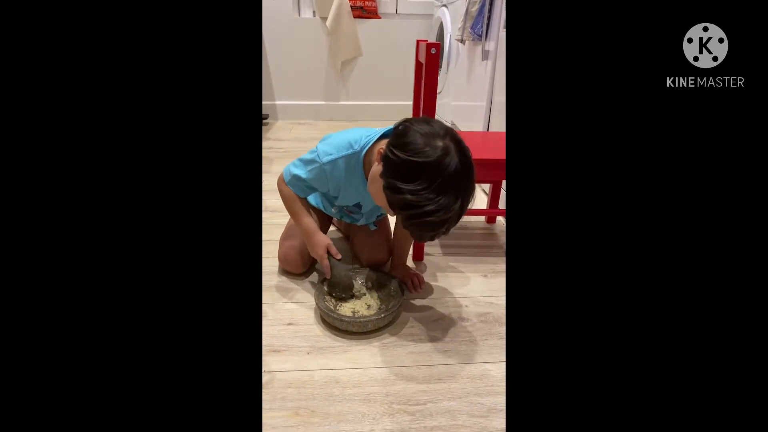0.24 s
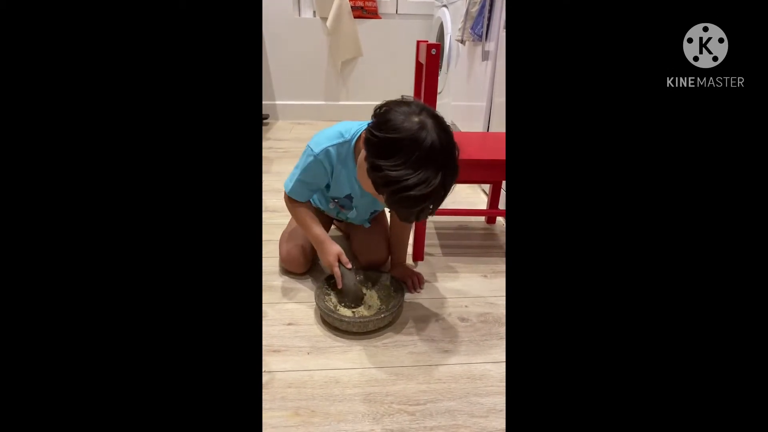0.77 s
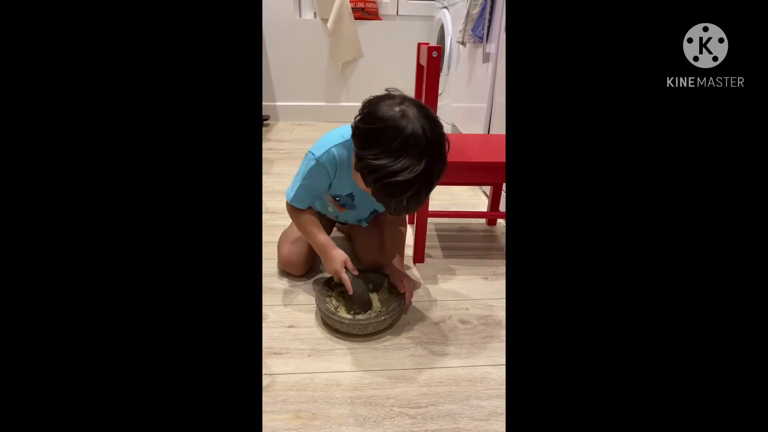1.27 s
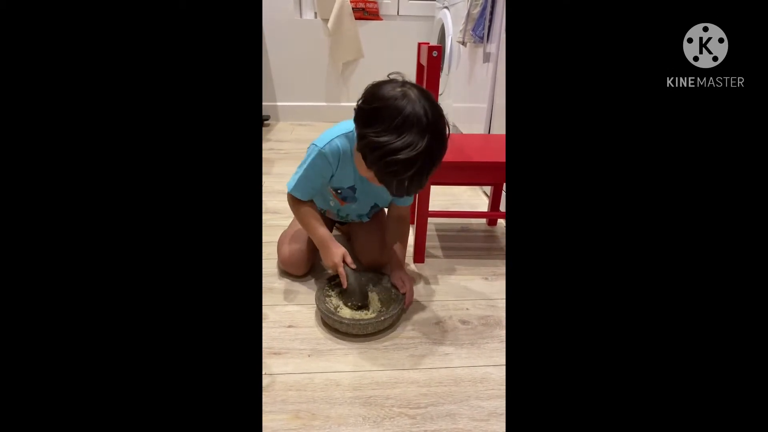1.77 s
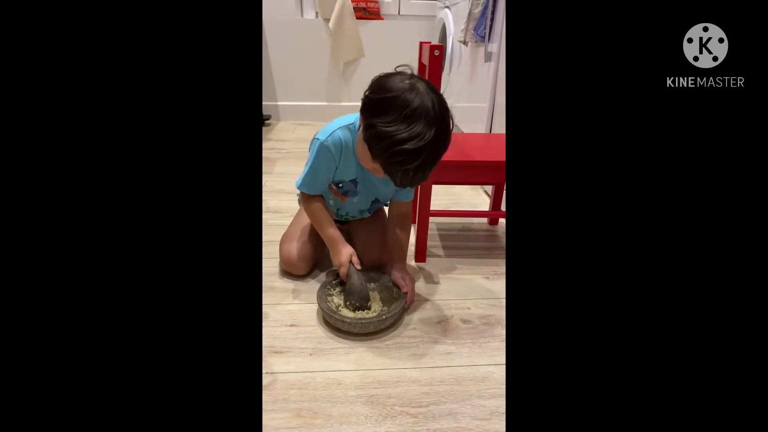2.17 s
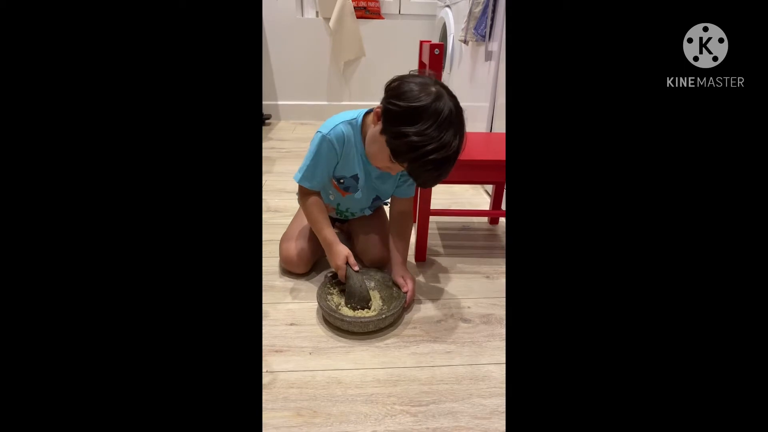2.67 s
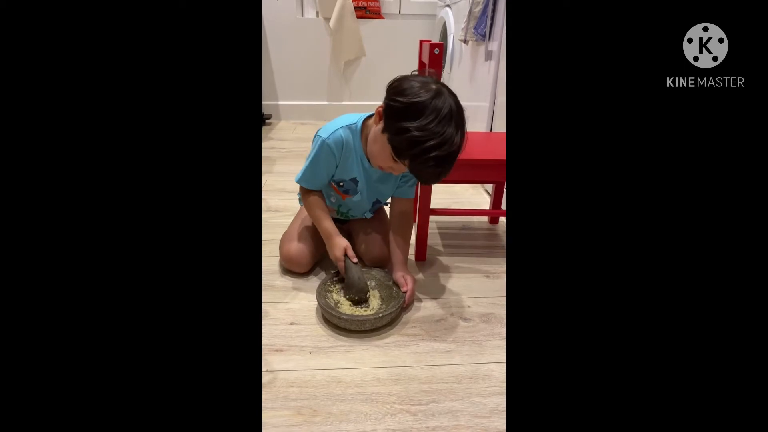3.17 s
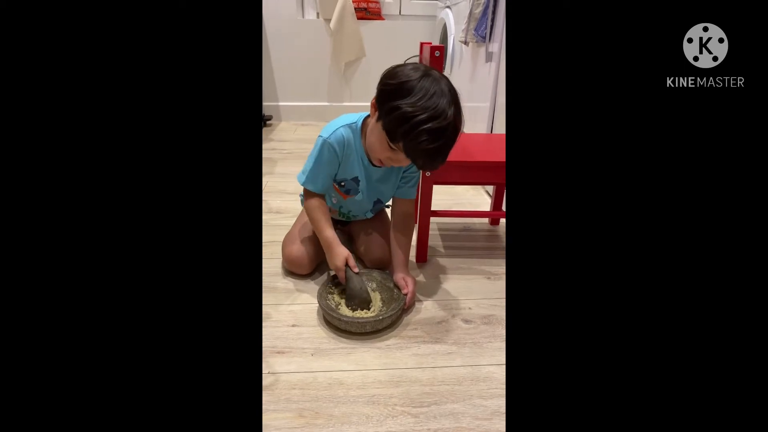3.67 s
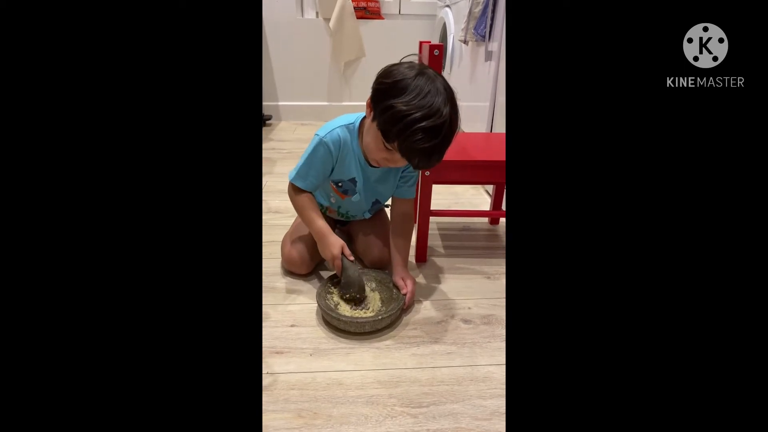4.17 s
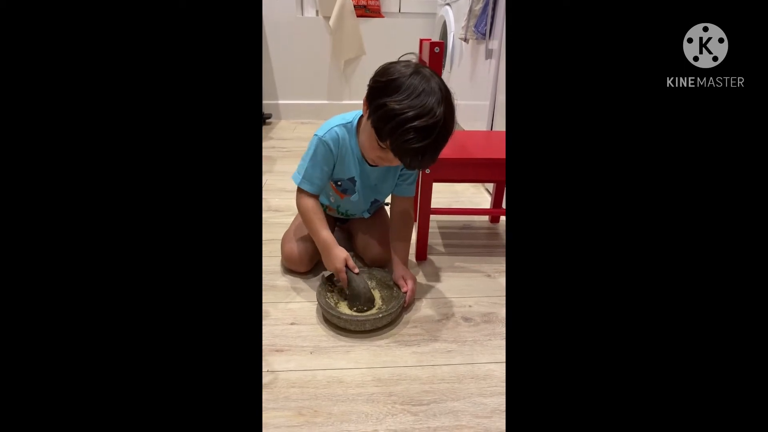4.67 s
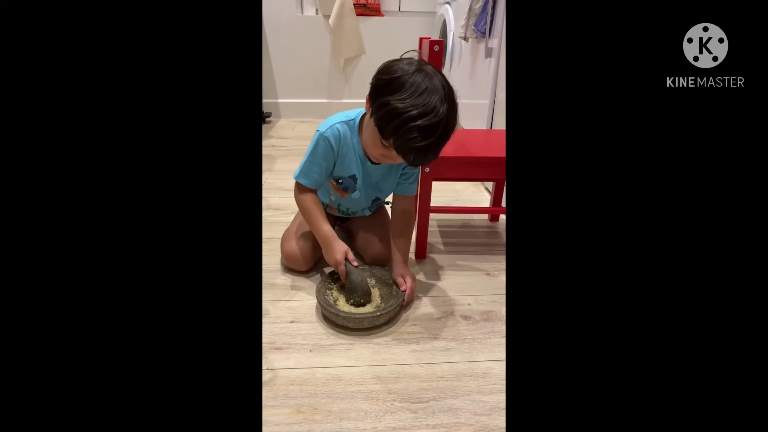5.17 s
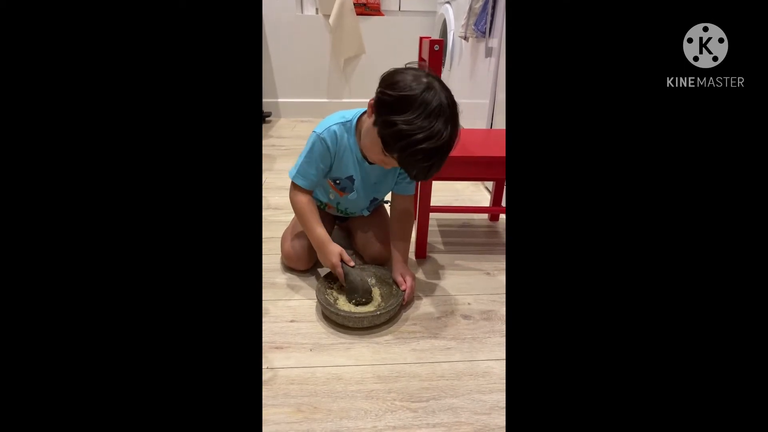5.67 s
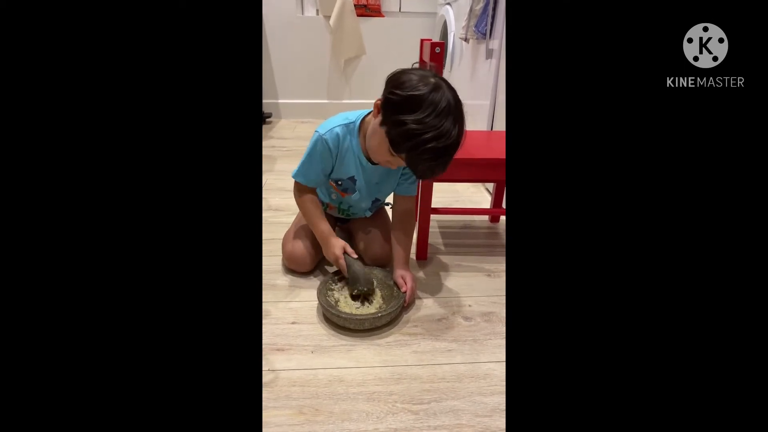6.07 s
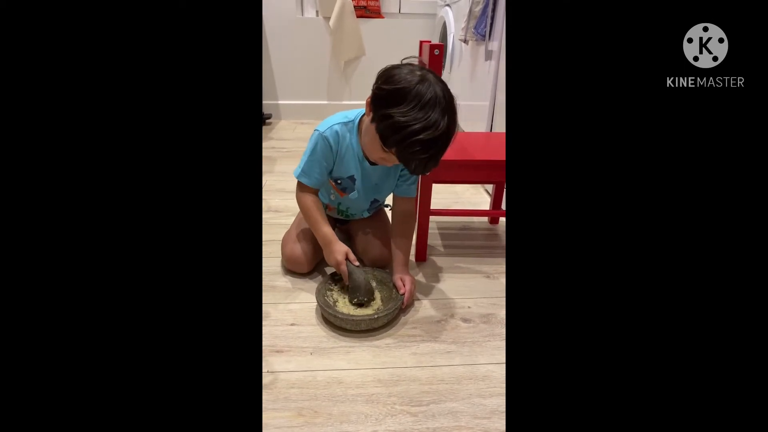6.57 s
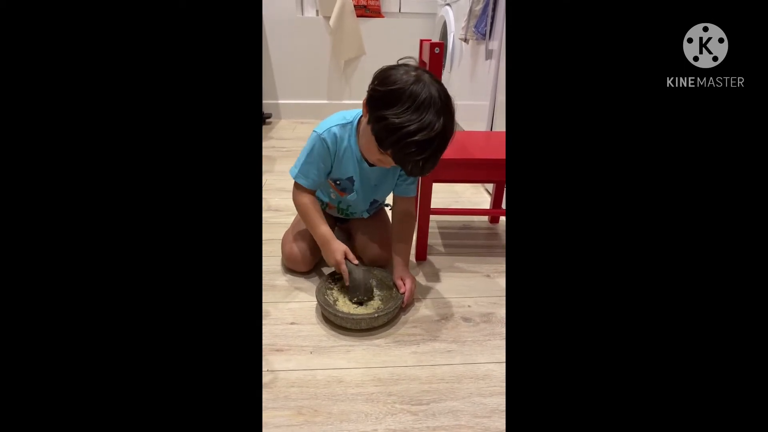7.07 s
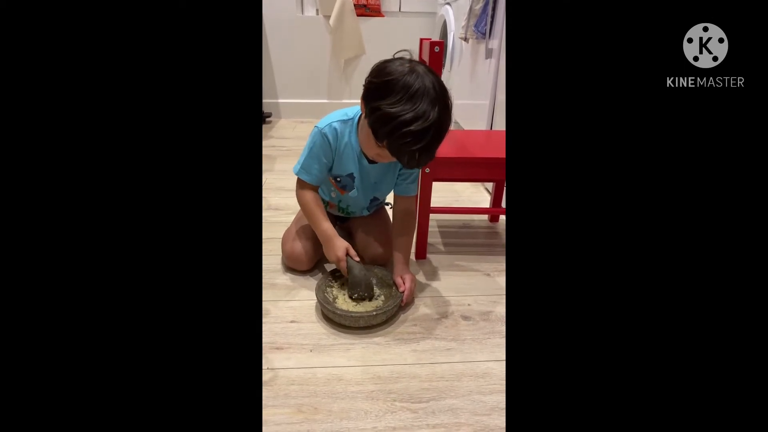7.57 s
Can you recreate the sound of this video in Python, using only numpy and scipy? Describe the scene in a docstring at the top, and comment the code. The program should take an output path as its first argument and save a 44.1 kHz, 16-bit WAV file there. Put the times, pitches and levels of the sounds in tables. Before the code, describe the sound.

Indoors in a small room with about a second of reverberation, heard close in stereo. At 0 s the tail of an earlier knock and its floor shudder dies away into quiet air. At 0.6 s a heavy low thump with a grain crunch. From 0.9 to 2.4 s quick grinding strokes, seven or eight a second, gritty and scraping, loudest around 1.6 to 2.1 s, with bright stony chinks and low lurches of the boards. After a pause, a loud hard clack rings at 2.85 s. From 3.05 to 5.3 s softer, duller strokes roll on, with muffled bumps near 3.6, 4.1 and 4.4 s and scattered grain snaps. Around 5.7 s a very faint woody creak ticks. Scraping returns at 5.9 to 6.6 s, harshest at 6.0 and 6.3. A second loud clack hits at 6.85 s, a lesser thud at 7.16 s, then soft strokes to about 7.7 s.

```python
"""A stone pestle grinds dry grains in a stone mortar on a wooden floor in a small room.
Strokes are random fracture clicks heard through bowl and pestle; rolling stone rumbles the floor and each
stroke lurches it. Knocks and chinks are damped modes, grain snaps are noise bursts, a creak is soft ticks.
An earlier knock, as fading noise, is still dying away at the start over still room air."""
import sys
import numpy as np
from scipy import signal
from scipy.fft import rfft, irfft, next_fast_len
from scipy.io import wavfile

SR = 44100
rng = np.random.default_rng(int(sys.argv[2]) if len(sys.argv) > 2 else 0)


def generate_wav(signal):
    """Clip the signal to [-1, 1] and save it as 16-bit WAV at the path in sys.argv[1]."""
    frames = np.transpose(np.atleast_2d(signal))
    scaled = np.clip(frames, -1, 1) * 32767
    pcm = np.round(scaled).astype(np.int16)
    wavfile.write(sys.argv[1], SR, pcm)


N = 345296


def amp(db):
    """Decibels to gain."""
    return 10 ** (np.asarray(db) / 20)


def unit_rms(x):
    """Scales to an rms of 1."""
    return x / np.sqrt(np.mean(x ** 2) + 1e-20)


def read(points, hz):
    """Interpolates a table along a log-frequency axis."""
    point_hz, value = np.transpose(points)
    return np.interp(np.log(hz + 1), np.log(point_hz + 1), value)


def add(mix, start_s, sound):
    """Mixes a sound in at start_s."""
    part = mix[max(round(start_s * SR), 0):][:len(sound)]
    part += sound[:len(part)]


def bins_hz(size):
    """Frequencies of a spectrum of size samples."""
    return np.fft.rfftfreq(size, 1 / SR)


def coloured(x, points):
    """Shapes x by a smooth gain curve, at an rms of 1."""
    size = next_fast_len(x.shape[-1] + SR // 20)
    gain = amp(read(points, bins_hz(size)))
    return unit_rms(irfft(rfft(x, size) * gain, size)[..., :x.shape[-1]])


def cut(x, hz, kind, order):
    """Butterworth low-pass or high-pass."""
    sos = signal.butter(order, min(hz, SR / 2 - 1), kind, fs=SR, output="sos")
    return signal.sosfilt(sos, x)


def ringing(modes, size=30000):
    """Click response of a body: a sum of exponentially decaying modes."""
    t = np.arange(size) / SR
    return sum(amp(level_db) * np.exp(-np.log(1000) * t / t60_s) * np.cos(2 * np.pi * pitch_hz * t)
               for pitch_hz, level_db, t60_s in modes)


# left-right likeness of room sound at two close ports: [freq_hz, likeness_0_to_1]
PORT_LIKENESS = [(200, .99), (500, .88), (1200, .75), (2300, .2), (3300, .3), (4800, .65), (8000, .98),
                 (11000, .98), (15000, .7)]


def diffuse(pair):
    """Makes two unrelated signals as alike as room sound is at two close ports."""
    size = next_fast_len(pair.shape[-1])
    a, b = rfft(pair, size)
    same = np.clip(read(PORT_LIKENESS, bins_hz(size)), 0, 1)
    return irfft(np.array([a, same * a + np.sqrt(1 - same ** 2) * b]), size)[:, :pair.shape[-1]]


# room decay: [freq_hz, t60_s]
ROOM_DECAY = [(80, 0.79), (250, 0.74), (800, 0.9), (1600, 1), (3200, 0.9), (7000, 0.77), (15000, 1)]


def dying(pair, stretch=1):
    """Lets every band fade at the pace of the room, times stretch."""
    hz, t, z = signal.stft(pair, SR, nperseg=256)
    t60_s = stretch * read(ROOM_DECAY, hz)[:, None]
    fade = np.exp(-np.log(1000) * t / t60_s)
    return signal.istft(z * fade, SR, nperseg=256)[1][:, :pair.shape[-1]]


# spectra of still air, earlier knock's echo, floor shudder: [freq_hz, gain_db]
AIR_COLOUR = [(20, -52), (35, -36.5), (50, 9), (75, -6), (130, -11), (220, -21), (400, -22.5), (800, -22),
              (1600, -30), (3200, -27), (7000, -34), (15000, -40.5)]
ECHO_COLOUR = [(25, -2.5), (80, -1), (300, -12), (600, -16.5), (1200, -22.5), (2500, -24.5), (5000, -27.5),
               (9000, -32), (14000, -56), (16000, -39)]
SHUDDER_COLOUR = [(25, -14), (48, -1), (85, 9), (110, -5.5), (140, 7), (230, 2), (320, 0.5), (450, -7.5),
                  (800, -56.5)]


def background():
    """Still room air, and the fading echo and floor shudder of the knock just before, all shaped noise."""
    t = np.arange(N) / SR
    air = amp(-55.5) * coloured(diffuse(rng.standard_normal((2, N))), AIR_COLOUR)
    echo = coloured(diffuse(rng.standard_normal((2, N))), ECHO_COLOUR)
    echo = amp(-27) * dying(echo, stretch=.93)
    shudder = amp(-18.5) * coloured(rng.standard_normal(N), SHUDDER_COLOUR) * np.exp(-t / .023)
    return air + echo + shudder


# stone on stone; levels relative within each column:
# [start_s, blow_db, contact_cutoff_hz, crunch_db, thump_db, thump_hz, thump_decay_s]
KNOCKS = [(.621, -25, 1240, -26.5, -17.5, 86.8, .032), (1.091, -30, 1940, -36.5, -45, 160, .008),
          (2.847, -2, 3900, -11.5, -1.5, 159.6, .0038), (3.575, -48, 1200, -42, -28, 88, .018),
          (4.089, -52, 1970, -37, -27, 131, .0047), (4.3787, -46, 1093, -26.5, -23.5, 148, .0067),
          (6.8534, -4.3, 2150, -16, -7, 186, .0052), (7.158, -28, 1196, -28, -22.5, 159.8, .019)]
# bowl modes before damping, quick clack then lasting ring: [pitch_hz, level_db, t60_s]
BOWL_MODES = [(487, -19.5, 0.12), (820, -17, 0.051), (1302, -8, 0.024), (1563, 5.5, 0.032),
              (2010, -4, .025), (2325, -9, 0.012), (2885, -7.5, 0.027), (3663, -6, 0.053), (814, -37.5, .3),
              (1470, -30, .42), (1571, -22, .6), (1602, -29, 1), (1659, -27, .35), (3890, -30, 0.62)]
# spectrum of crushed grain: [freq_hz, gain_db]
CRUNCH_COLOUR = [(200, -12), (500, -1), (850, 5.5), (1500, -5.5), (2300, -9), (3800, -15), (5000, -15),
                 (8000, -26.5), (16000, -37)]
SETTLE_DB, SETTLE_S = -4.5, .024  # the pestle comes to rest on the ringing stone and damps it
GRAZE_LEAD_S, GRAZE_DB = .009, -25  # the pestle grazes the bowl just before it lands


def knocks():
    """A short contact rings the bowl and crushes what lies under it; then the floor gives and shudders."""
    out, bowl = np.zeros(N), ringing(BOWL_MODES)
    t = np.arange(len(bowl)) / SR
    settle = amp(SETTLE_DB * (1 - np.exp(-(t / SETTLE_S) ** 2)))
    for start_s, blow_db, cutoff_hz, crunch_db, thump_db, thump_hz, thump_decay_s in KNOCKS:
        clack = cut(bowl, cutoff_hz, "low", order=3)
        clack = cut(clack, 4300, "low", order=6)  # no contact is short enough to ring the top
        clack = amp(blow_db - 7) * settle * cut(clack, 350, "high", order=2)
        add(out, start_s - GRAZE_LEAD_S, amp(GRAZE_DB) * clack)
        add(out, start_s, clack)

        crunch = coloured(rng.standard_normal(len(t)), CRUNCH_COLOUR) * np.exp(-t / .005)
        add(out, start_s, amp(crunch_db - 4) * cut(crunch, 5000, "low", order=2))

        bounce = -np.sin(2 * np.pi * thump_hz * t) * np.exp(-t / thump_decay_s)
        bounce *= 1 - np.exp(-t / .0005)
        shudder = coloured(rng.standard_normal(len(t)), SHUDDER_COLOUR)
        shudder *= np.exp(-t / .044) * (1 - np.exp(-t / .0041))
        thump = cut(bounce + amp(-16.5) * shudder, 38, "high", order=2)
        add(out, start_s + .003, amp(thump_db) * thump)
    return out


# large grains crack; levels relative: [start_s, treble_db, body_re_treble_db]
SNAPS = [(.617, -18.5, -2.5), (.6207, -22, -17), (.8062, -30.5, -1.5), (.8756, -32, -2.5),
         (1.1638, -42.5, 9.5), (2.9422, -34, 8), (3.0772, -40.5, 9), (3.549, -39, -1.5), (4.936, -40, -2),
         (4.9914, -46, 20), (5.131, -43, 4), (5.2609, -36, 2), (5.441, -43.5, -6), (5.573, -40, -7),
         (6.0203, -35.5, 13.5), (6.2909, -45, 22), (6.5063, -43, -4.5), (7.0504, -44, -.5),
         (7.426, -35, -16), (7.6344, -41, 4)]
# spectrum of a bursting grain: [freq_hz, gain_db]
CRACK_COLOUR = [(300, -27), (900, -2.5), (4000, 8.5), (7000, 11), (13000, 2), (16000, 10.5)]


def snaps():
    """A grain bursts in a few milliseconds of bright crackle."""
    out, t = np.zeros(N), np.arange(2048) / SR
    for start_s, treble_db, body_db in list(SNAPS) + small_snaps():
        burst = coloured(rng.standard_normal(len(t)), CRACK_COLOUR)
        treble = cut(burst, 3500, "high", order=3)
        body = cut(burst, 3700, "low", order=3)
        crackle = treble + amp(body_db + 4.5) * body
        add(out, start_s, amp(treble_db + 1) * crackle * np.exp(-t / .0024))
    return out


# strokes: [start_s, length_s, floor_weight_db, grit_bite_db, board_pitch_hz]
STROKES = [(.867, .16, -7, -17, 140), (1.045, .077, -7, -16, 190), (1.181, .1, -2, -9, 175),
           (1.3, .12, -6, -13, 170), (1.44, .1, 1, -3, 190), (1.553, .067, -7, -13, 165),
           (1.624, .047, -3, 1, 190), (1.741, .105, -4, -1, 205), (1.887, .09, -6, -2.5, 215),
           (2.025, .099, -3, -2.5, 170), (2.147, .088, -11, -13, 155), (2.281, .077, -13, -8, 185),
           (3.052, .12, -6, -18, 168), (3.227, .12, -9, -16, 160), (3.406, .094, -4, -18, 160),
           (3.538, .12, -11, -16, 160), (3.703, .1, -2, -14, 172), (3.824, .13, -4, -14, 200),
           (3.981, .11, -10, -11, 160), (4.457, .092, -11, -18, 165), (4.595, .086, -7, -16.5, 170),
           (4.737, .14, -11, -15, 200), (4.941, .13, -1, -8, 185), (5.096, .11, -7, -10, 175),
           (5.215, .097, -28, -22, 150), (5.54, .093, -11, -26, 148), (5.876, .1, -9, -23, 175),
           (6.009, .087, -3, -1, 195), (6.147, .085, -4, -17, 180), (6.278, .096, -4, -5.5, 160),
           (6.401, .084, -6, -20, 160), (6.522, .098, -7, -19, 210), (6.937, .066, -3, -14, 145),
           (7.047, .11, -4, -17, 155), (7.215, .062, -3, -22, 185), (7.374, .11, -16, -30, 145),
           (7.506, .079, -8, -17.5, 155), (7.612, .094, -2, -20, 140)]
SMALL_SNAP_CHANCE = .5  # per stroke
SMALL_SNAP_DB, SMALL_SNAP_SPREAD_DB, SMALL_SNAP_BODY_DB = -50, 3, 15
SMALL_SNAP_DB_PER_BITE_DB = .5  # a harder bite cracks larger grains


def small_snaps():
    """Lesser grains give way at chance moments as a stroke presses down: rows like those of SNAPS."""
    rows = []
    for start_s, length_s, _, bite_db, _ in STROKES:
        luck, place, size = rng.random(3)
        if luck < SMALL_SNAP_CHANCE:
            snap_s = start_s + length_s * (.25 + place / 2)
            treble_db = SMALL_SNAP_DB + SMALL_SNAP_DB_PER_BITE_DB * bite_db
            treble_db += SMALL_SNAP_SPREAD_DB * (2 * size - 1)
            rows.append((snap_s, treble_db, SMALL_SNAP_BODY_DB))
    return rows


def grit(per_s, spread_db):
    """Tiny fractures under the pestle: random clicks, a few much larger than the rest."""
    size = amp(spread_db * np.minimum(rng.exponential(1, N), 4))
    happens = rng.random(N) < per_s / SR
    return unit_rms(size * rng.choice([-1., 1.], N) * happens)


def pressure(layer, efforts_db):
    """Each stroke swells, holds and eases off; a layer grows with the effort by its own law."""
    full_db, growth, lag_s, length_share, steepness = layer
    t, power = np.arange(0, N, 64) / SR, 0
    for (start_s, length_s, *_), effort_db in zip(STROKES, efforts_db):
        u = (t - start_s - length_s / 2 - lag_s) / (length_s * length_share / 2)
        power = power + amp(full_db + growth * effort_db) ** 2 * np.exp(-abs(u) ** steepness)
    return np.interp(np.arange(N) / SR, t, np.sqrt(power))


# nominal pestle modes: [pitch_hz, level_db, t60_s]
PESTLE_MODES = [(3070, -24.5, 0.044), (3240, -31, .04), (3133, 3, 0.056), (3263, -6, .025),
                (3520, -14.5, 0.033), (3850, -10.5, .03), (4860, 0, 0.047), (5497, -8.5, .01),
                (7033, -13, .022), (8450, -49, 0.051), (11000, -22, 0.006), (13400, -15, .02)]


def pestle(fractures, detune=.011, vary_db=9.5, count=24, size=1400):
    """The contact point rolls on; each spot favours and bends the modes in its own way."""
    spots = []
    for draw in rng.standard_normal((count, len(PESTLE_MODES), 2)):
        modes = [(pitch_hz * (1 + detune * bend), level_db + vary_db * favour, t60_s)
                 for (pitch_hz, level_db, t60_s), (bend, favour) in zip(PESTLE_MODES, draw)]
        spots.append(unit_rms(ringing(modes, size=3000)))
    out = np.zeros(N)
    for start in range(0, N, size):
        spot = spots[rng.integers(count)]
        add(out, start / SR, signal.fftconvolve(fractures[start:start + size], spot))
    return out


# stroke layers: [full_effort_db, db_per_effort_db, lag_s, length_share, edge_steepness]
SCRAPE_LAYER = (-33.9, .98, .002, .69, 2.8)
RING_LAYER = (-30.8, 1.1, -.004, .67, 3.5)
FIZZ_LAYER = (-36, .86, -.004, .7, 2.2)
RUMBLE_LAYER = (-31.3, 1, .005, .8, 2.4)
# spectra of bowl scrape and floor rumble: [freq_hz, gain_db]
SCRAPE_COLOUR = [(250, 13.5), (430, 5), (520, 5.5), (660, -2), (770, 3), (1000, 1), (1330, -7.5), (1570, 3),
                 (1850, -6), (2400, -37), (3500, 5.5), (6000, -51.5)]
RUMBLE_COLOUR = [(26, -34), (45, -7.5), (92, -3.5), (130, 5), (222, 1), (238, 4), (265, -7), (346, -7),
                 (382, -26.5), (448, -38), (480, -18), (620, -50), (1060, -120)]
# how strongly strokes set the bowl scraping: [time_s, bowl_db]
BOWL_SHARE = [(1.2, 3), (1.55, 2), (1.8, -2.5), (2.3, .5), (5.2, -1), (6, 4.5), (6.35, 6), (7.7, 2)]
PESTLE_DB_PER_BOWL_DB = -.4  # the pestle rings less as the bowl takes more


def grinding():
    """The same fractures sound through bowl and pestle; the rolling of the stone shakes the floor."""
    _, _, weight_db, bite_db, _ = np.transpose(STROKES)
    bowl_db = np.interp(np.arange(N) / SR, *np.transpose(BOWL_SHARE))
    # grains break in clusters
    clumps = coloured(rng.standard_normal(N), [(10, -18), (30, -.5), (90, -7.5), (250, -39), (1000, -85.5)])
    fractures = grit(per_s=2000, spread_db=3) * amp(1.8 * clumps)
    stone = pestle(fractures)

    scrape = coloured(fractures, SCRAPE_COLOUR) * pressure(SCRAPE_LAYER, bite_db) * amp(bowl_db)
    ring = unit_rms(cut(stone, 4200, "low", order=6)) * pressure(RING_LAYER, bite_db)
    fizz = cut(cut(stone, 20000, "low", order=4), 4400, "high", order=6)
    fizz = unit_rms(fizz) * pressure(FIZZ_LAYER, bite_db)
    rumble = coloured(grit(per_s=740, spread_db=4), RUMBLE_COLOUR) * pressure(RUMBLE_LAYER, weight_db)
    return scrape + (ring + fizz) * amp(PESTLE_DB_PER_BOWL_DB * bowl_db) + rumble


LURCH_DB, LURCH_LAG_S = -25.5, .005  # level at 0 dB weight; delay after mid-stroke


def lurches(width_s=.011, fall_per_s=8.74):
    """Bending waves in the boards arrive high notes first, so each lurch sinks in pitch."""
    out, t = np.zeros(N), np.arange(-2048, 2048) / SR
    for start_s, length_s, weight_db, _, pitch_hz in STROKES:
        turns = np.cumsum(pitch_hz * np.exp(-fall_per_s * t)) / SR + rng.random()
        wave = np.sin(2 * np.pi * turns) * np.exp(-(t / width_s) ** 2 / 2)
        peak_s = start_s + length_s / 2 + LURCH_LAG_S
        add(out, peak_s + t[0], amp(LURCH_DB + weight_db) * wave)
    return out


# the pestle catches and chinks: [start_s, relative_db]
CHINKS = [(1.208, -21.5), (1.341, -32), (1.457, -30), (1.636, -24), (1.808, -25), (2.064, -29),
          (2.195, -31), (4.008, -29), (5.136, -32), (6.019, -27), (6.292, -26)]


def chinks(detune=.012):
    """A larger slip builds over a millisecond or two and rings the pestle, each time at another spot."""
    out, rise = np.zeros(N), 1 - np.exp(-np.arange(4096) / SR / .0012)
    for start_s, level_db in CHINKS:
        bends = rng.standard_normal(len(PESTLE_MODES))
        modes = [(pitch_hz * (1 + detune * bend), mode_db, t60_s)
                 for (pitch_hz, mode_db, t60_s), bend in zip(PESTLE_MODES, bends)]
        chink = cut(ringing(modes, size=4096), 4500, "low", order=3) * rise
        add(out, start_s, amp(level_db - 3) * chink)
    return out


# soft ticks of a faint creak: [centre_s, peak_db]
CREAK_TICKS = [(5.681, -49.5), (5.732, -49.5), (5.771, -58), (5.814, -51), (5.859, -56)]


def creak(pitch_hz=980, width_s=.0015):
    """Each tick is a few cycles of one low, woody note."""
    out, t = np.zeros(N), np.arange(-256, 256) / SR
    tick = np.cos(2 * np.pi * pitch_hz * t) * np.exp(-(t / width_s) ** 2 / 2)
    for centre_s, peak_db in CREAK_TICKS:
        add(out, centre_s + t[0], amp(peak_db) * tick)
    return out


def room(x, count=3):
    """Dense reflections start after the nearest wall and shift as the pestle moves; bass stays mostly direct."""
    t, out = np.arange(SR * 3 // 4) / SR, 0
    wet_db = [(120, -9), (300, -9), (800, -4), (1600, -6), (2500, -2.5), (4000, -5.5), (7000, -6), (14000, -14.5)]
    wet = amp(read(wet_db, bins_hz(len(t))))
    onset = np.clip((t - .007) / .0048, 0, 1)
    early_boost = 1 + 2.3 * np.exp(-t / .022)
    for k in range(count):
        happens = rng.random((2, len(t))) < 4000 / SR  # 4000 reflections per second
        taps = rng.choice([-1., 1.], (2, len(t))) * happens
        tail = dying(diffuse(taps)) * onset * early_boost
        tail = irfft(rfft(tail / np.linalg.norm(tail[0])) * wet, len(t))
        # squared shares sum to 1
        share = np.sqrt(2 / count) * np.cos(np.pi * (np.arange(N) / SR + k / count))
        out = out + signal.fftconvolve((x * share)[None], tail, axes=1)[:, :N]
    return out


def scene():
    """The mortar, straight and by way of the room, over the background."""
    mortar = grinding() + lurches() + knocks() + chinks() + snaps() + creak()
    return mortar + room(mortar) + background()


# level between the ports: [freq_hz, left_minus_right_db]
PORT_BALANCE = [(280, 0), (550, 3), (900, 3.5), (1600, 2.5), (3000, 1.2), (4500, 0)]
EDGE_HZ, LEFT_LEAD_S, CEILING = 15900, 4.9e-5, .9


def record(dry):
    """Two close ports, the left a little nearer and louder; soft overload; the band limit."""
    size = next_fast_len(N + SR // 10)
    padded = np.pad(dry, ((0, 0), (0, size - N)))
    hz = bins_hz(size)
    tilt = amp(read(PORT_BALANCE, hz) / 2) * np.exp(1j * np.pi * hz * LEFT_LEAD_S)
    ports = irfft(rfft(padded) * np.array([tilt, 1 / tilt]), size)[:, :N]
    limited = ports / (1 + (ports / CEILING) ** 6) ** (1 / 6)
    band = signal.firwin(511, EDGE_HZ, window=("kaiser", 9), fs=SR)
    return signal.oaconvolve(limited, band[None], "same")


dry = scene()
out = record(dry)
generate_wav(out)
```